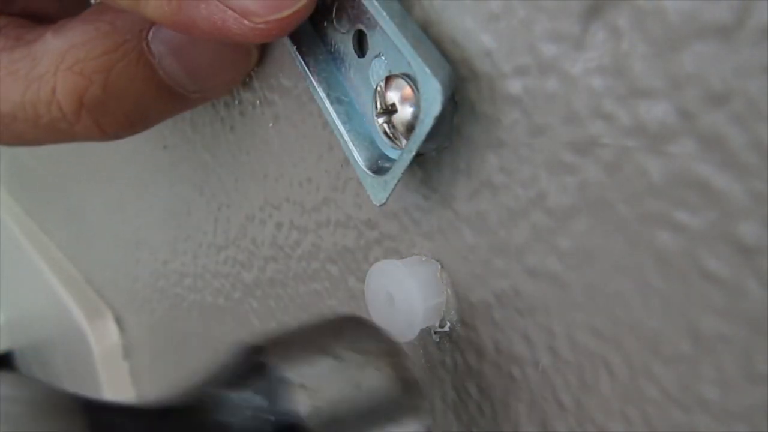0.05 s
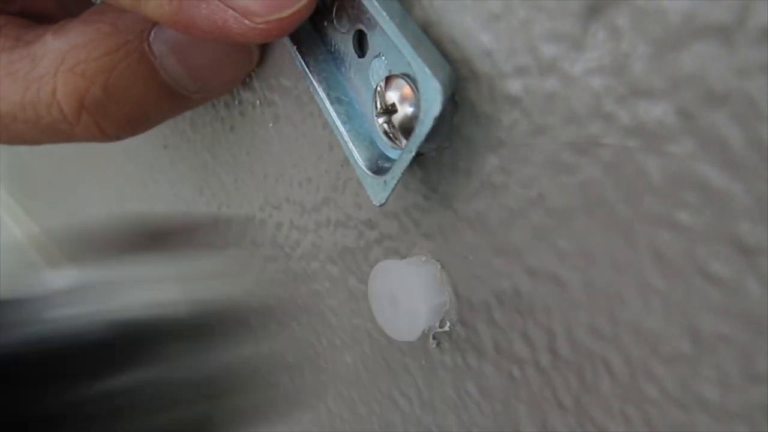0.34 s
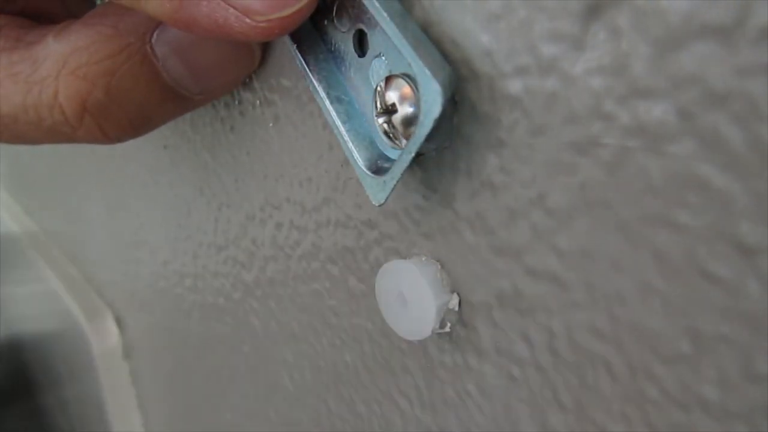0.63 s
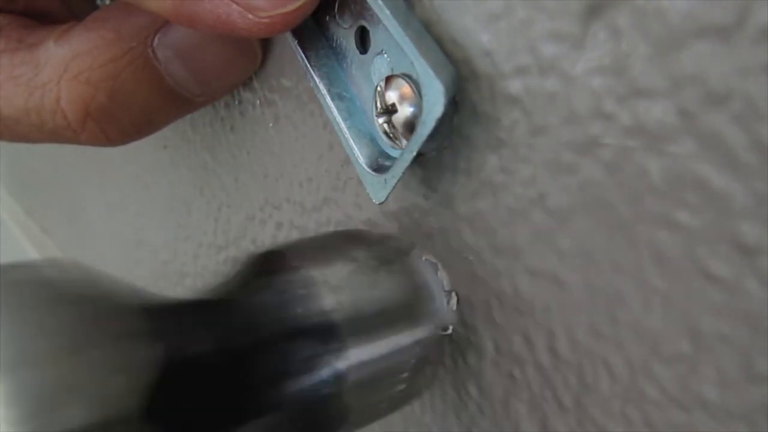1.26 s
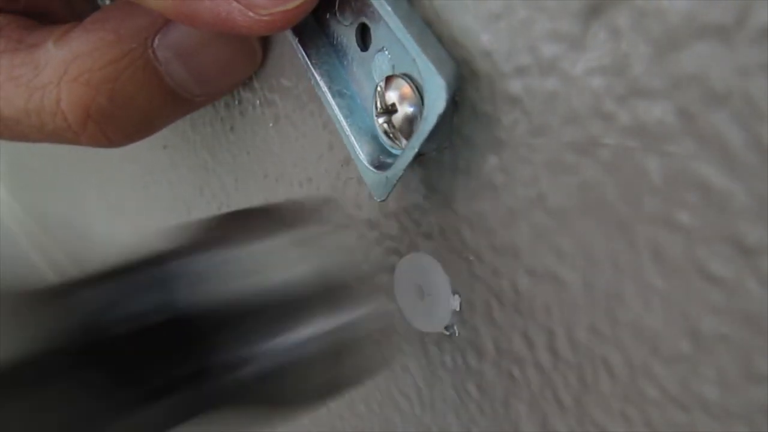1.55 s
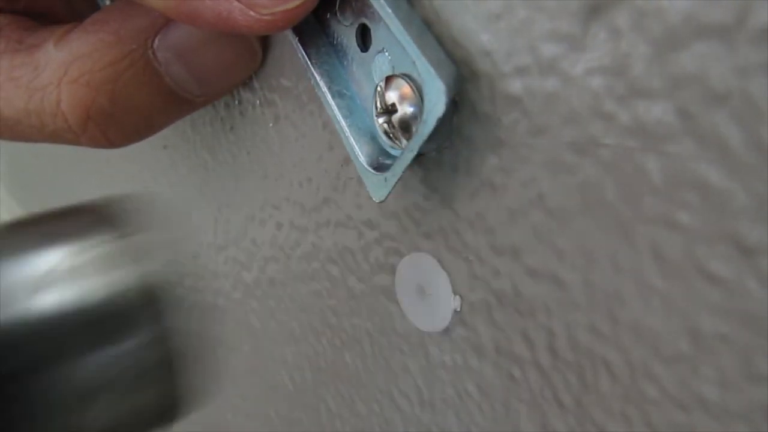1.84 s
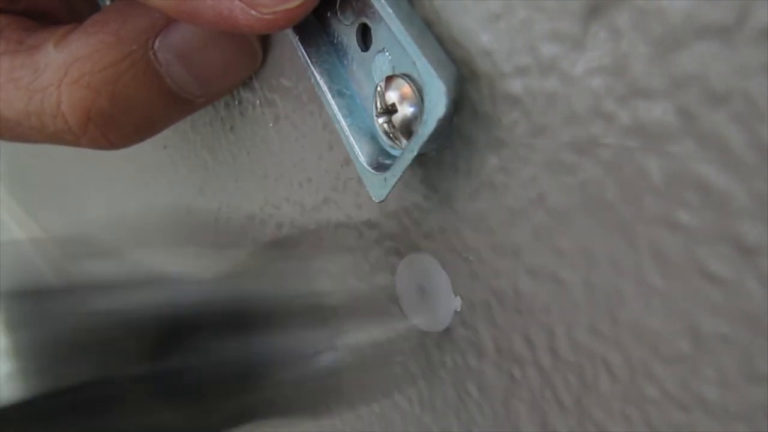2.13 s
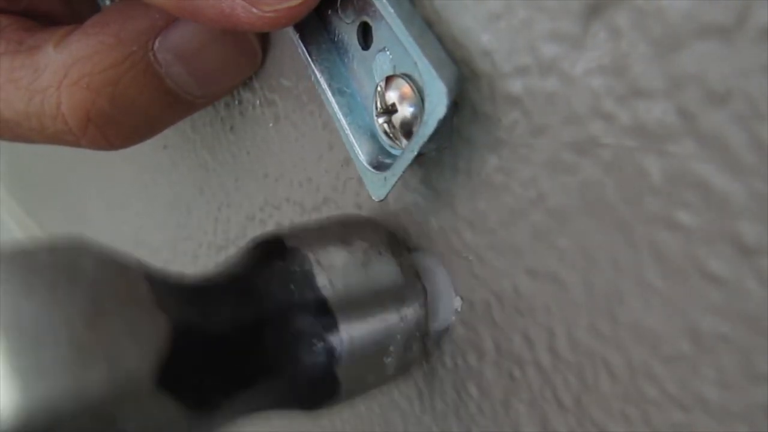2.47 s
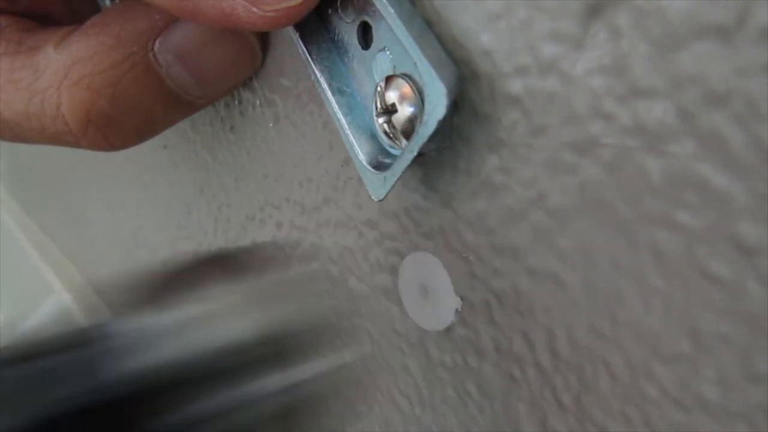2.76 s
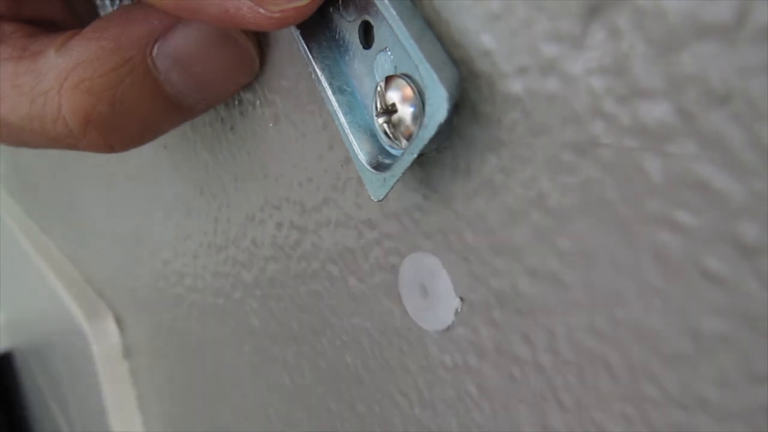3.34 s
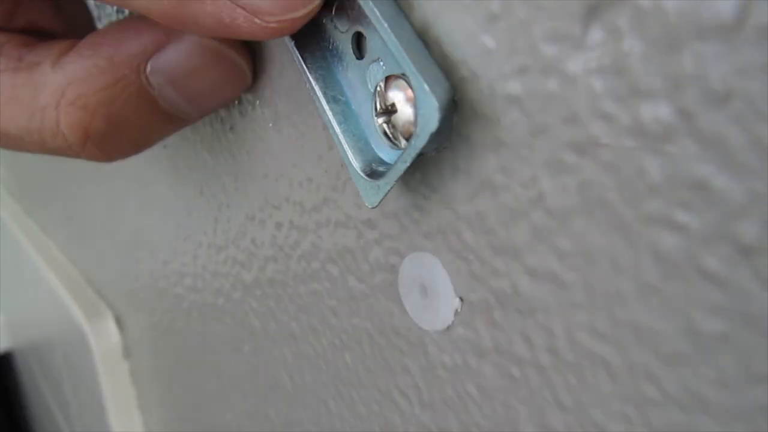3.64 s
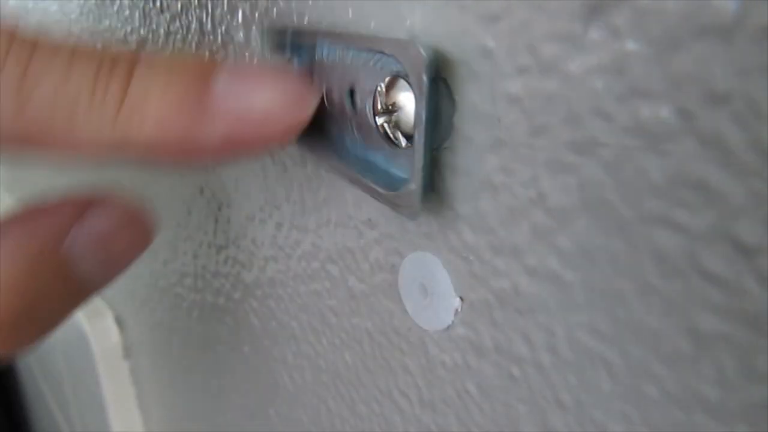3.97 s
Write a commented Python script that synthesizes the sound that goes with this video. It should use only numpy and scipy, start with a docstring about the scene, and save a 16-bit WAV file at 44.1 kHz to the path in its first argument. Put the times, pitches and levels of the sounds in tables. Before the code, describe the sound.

Steady, quick hammer blows drive a plastic anchor into a hollow wall in a small room, overloading the close microphone and rattling a metal bracket. After the hammering ends, fingers shift the bracket with a few soft ticks and scrapes.

```python
"""A small room: a hammer taps a plastic anchor into a hollow wall, four blows a second, close up.
Each blow shoves the wall panel and makes a loose metal bracket chatter; the hammer bounces once.
The knocks harden as the anchor sinks, and the thuds overload the microphone.
At the end, fingers shift the bracket with a few ticks and scrapes."""
import sys
import numpy as np
from scipy import signal
from scipy.fft import rfft, irfft, next_fast_len
from scipy.io import wavfile
from scipy.ndimage import uniform_filter1d

SR = 44100
rng = np.random.default_rng(int(sys.argv[2]) if len(sys.argv) > 2 else 0)


def wav_out(sig):
    """Save sig, one row per channel (or a flat mono array), as 16-bit PCM at SR to the path in sys.argv[1]."""
    wavfile.write(sys.argv[1], SR, np.round(np.clip(np.atleast_2d(sig).T, -1, 1) * 32767).astype(np.int16))


N = 176400
T = np.arange(int(.8 * SR)) / SR  # time axis of one event
BRIGHT_HZ = 3480  # shelf corner for every bright_db


def amp(db):
    """Decibels to gain."""
    return 10 ** (np.asarray(db) / 20)


def unit(x):
    """Scale to rms 1."""
    return x / np.sqrt(np.mean(x ** 2) + 1e-20)


def fade(t60_s):
    """Exponential decay, 60 dB in t60_s."""
    return np.exp(-np.log(1000) * T / t60_s)


def rise(tau_s=0.0027):
    """Exponential build-up of a resonance."""
    return 1 - np.exp(-T / tau_s)


def along(points, hz):
    """Interpolate (freq_hz, value) points on a log frequency axis."""
    freq_hz, values = np.transpose(points)
    return np.interp(np.log(hz + 1), np.log(freq_hz + 1), values)


def filtered(x, response):
    """Apply a frequency response by FFT."""
    size = next_fast_len(len(x) + SR // 10)
    return irfft(rfft(x, size) * response(np.fft.rfftfreq(size, 1 / SR)), size)[:len(x)]


def noise(colour, size=len(T)):
    """Coloured noise of rms 1."""
    return unit(filtered(rng.standard_normal(size), lambda f: amp(along(colour, f))))


def shelf(x, corner_hz, db):
    """High shelf."""
    return filtered(x, lambda f: amp(db * f ** 4 / (f ** 4 + corner_hz ** 4)))


def add(track, start_s, sound):
    """Mix a sound into the track."""
    part = track[max(round(start_s * SR), 0):][:len(sound)]
    part += sound[:len(part)]


def ring(modes):
    """Decaying modes; level and phase vary per strike."""
    return sum(amp(db + 2 * rng.normal()) * fade(t60_s) * np.sin(2 * np.pi * (hz * T + rng.random()))
               for hz, db, t60_s in modes)


# freq_hz, gain_db
HUSH_COLOUR = [(25, 20), (60, 10.5), (200, 8.5), (600, 0), (2500, -20), (6000, -19.5), (11000, -17),
               (13000, -38.5)]

def room_hush(level_db=-77):
    """Steady low background noise."""
    return amp(level_db) * noise(HUSH_COLOUR, size=N)


# freq_hz, gain_db
ROOM_COLOUR = [(30, -5.5), (65, -12), (100, 2.5), (200, 1.5), (260, -3.5), (400, 3), (600, -4),
               (800, -10.5), (1200, -14.5), (2000, -18), (2900, -19), (4000, -26.5), (7000, -34.5),
               (11300, -36.5), (12800, -49.5), (16000, -49)]
# freq_hz, t60_s
ROOM_DECAY = [(80, 0.63), (500, 0.5), (1500, 0.5), (3000, 0.47), (6000, 0.53), (10000, 0.3), (15000, 0.25)]

def room_tail():
    """Diffuse echo; each frequency dies at its own rate."""
    hz, time_s, spectrum = signal.stft(noise(ROOM_COLOUR), SR, nperseg=512)
    decay = np.exp(-np.log(1000) * time_s / along(ROOM_DECAY, hz)[:, None])
    return signal.istft(spectrum * decay, SR)[1][:len(T)]


# freq_hz, gain_db
HANDLING_COLOUR = [(100, -16), (500, 1.5), (2000, 5), (3500, 1), (5500, -11), (9000, -5), (11500, -10.5),
                   (13000, -29), (16000, -37)]
# start_s, level_db, t60_s, bright_db
TICKS = [(1.021, -56, .008, 9), (3.5099, -50, 0.019, -2.5), (3.706, -62.5, .012, 10),
         (3.7805, -41, 0.0067, 2.5), (3.881, -59, 0.012, -51), (3.959, -44, 0.014, -16),
         (3.969, -47.5, 0.017, -24), (3.976, -46, 0.026, 3.5)]
# start_s, length_s, level_db, bright_db
SCRAPES = [(3.484, 0.04, -63, -5), (3.6, 0.16, -86.5, 11), (3.907, 0.13, -60.5, -10.5)]

def handling(grain_db=4, room_db=-14.5):
    """The bracket ticks under the fingers and scrapes on the paint, with a little echo."""
    out = np.zeros(N)
    for start_s, level_db, t60_s, bright_db in TICKS:
        click = shelf(noise(HANDLING_COLOUR), BRIGHT_HZ, bright_db)
        add(out, start_s, amp(level_db) * click * fade(t60_s))
    for start_s, length_s, level_db, bright_db in SCRAPES:
        roughness = unit(uniform_filter1d(rng.standard_normal(len(T)), size=90))
        grains = unit(amp(grain_db * roughness))
        stroke = np.sin(np.pi * np.minimum(T / length_s, 1)) ** 2
        friction = shelf(noise(HANDLING_COLOUR), BRIGHT_HZ, bright_db)
        add(out, start_s, amp(level_db) * stroke * grains * friction)
    echo = shelf(rng.standard_normal(len(T)), BRIGHT_HZ, db=-5) * fade(t60_s=0.59)
    return out + amp(room_db) * signal.fftconvolve(out, echo / np.linalg.norm(echo))[:N]


# freq_hz, gain_db
CHATTER_COLOUR = [(400, 19), (1200, 15), (2600, 11.5), (4500, 4.5), (8000, 11), (11500, 1.5),
                  (13000, -17.5), (16000, -22)]
# pitch_hz, level_db, t60_s
BRACKET_MODES = [(8300, -63.5, .05), (11000, -47, 0.028), (11160, -49, 0.027), (15000, -40, .022),
                 (14800, -58.5, .1)]

def chatter(burst_db=-23.5):
    """One slap of the loose bracket: a gritty burst and a thin ring."""
    return amp(burst_db) * noise(CHATTER_COLOUR) * fade(t60_s=0.0091) + ring(BRACKET_MODES)


# pitch_hz; the wall panel's modes, then a high pair from the bracket or hammer
STRIKE_MODES_HZ = [114, 146, 163, 194, 237, 294, 326, 356, 457, 496, 533, 634, 832, 2780, 2960]
# per mode: level_db, t60_s
STRIKE_RING = [(-22.5, 0.18), (-36.5, .33), (-31, .28), (-30.5, 0.46), (-37.5, 0.27), (-37.5, 0.54),
               (-39, 0.66), (-25.5, 0.2), (-33.5, 0.29), (-40.5, .52), (-60.5, .45), (-41, 0.55), (-49, 0.51),
               (-58, 0.21), (-57, 0.24)]

def wall_resonance(shared_tail, hard_db, bright_db, room_db=-30, shared_fraction=.85):
    """The wall rings on, with a high ring of the bracket or hammer, and the room answers; most of the echo
    repeats from blow to blow."""
    tail = np.sqrt(shared_fraction) * shared_tail + np.sqrt(1 - shared_fraction) * room_tail()
    wall = ring(np.column_stack([STRIKE_MODES_HZ, STRIKE_RING]))
    ringing = (amp(room_db) * tail + wall) * rise()
    lifted = shelf(ringing, corner_hz=268, db=hard_db)
    hardened = shelf(lifted, corner_hz=2220, db=-hard_db)  # hardness acts on the mids only
    return shelf(hardened, BRIGHT_HZ, bright_db)


def panel_swing(contact_s, t60_s, pitch_hz=146.5, level_db=-11):
    """The panel swings back, heavily damped, once the hammer lets go."""
    released_s = np.maximum(T - contact_s, 0)
    return -amp(level_db) * np.sin(2 * np.pi * pitch_hz * released_s) * fade(t60_s)


def bounce_thud(contact_s=.0014, push_db=-15.02):
    """The hammer falls back on the anchor: a rounded push, then a brief swing."""
    push = amp(push_db) * np.sin(np.pi * np.minimum(T / contact_s, 1))
    return push + panel_swing(contact_s, t60_s=0.01)


def blow_thud(hard_db, crack_s=.00012, crack_db=-24.5, push_db=-9):
    """Steel meets plastic: a crack, an abrupt push, shorter as the anchor tightens, then the swing."""
    contact_s = .0011 * np.exp(-0.044 * hard_db)
    push = amp(push_db) * np.sqrt(np.clip(1 - T / contact_s, 0, 1))
    return np.where(T < crack_s, -amp(crack_db), push) + panel_swing(contact_s, t60_s=0.022)


# start_s, thud_db, ring_db, hard_db, bright_db, first_chatter_db, second_chatter_db
BLOWS = [(0.0, 13.5, -14.5, -3.5, -10, -32.5, -31), (0.2391, 10.5, -6.5, -7, -6, -15.5, -6),
         (0.4615, 8, -6.5, -7.5, -11, -12.5, 1.5), (0.7028, 9.5, -3.5, -5.5, -1, -4, -8),
         (0.9476, 6, -1.5, -6.5, -6, -34, -21), (1.1993, 8, -3.5, -4, 0.5, -9, -9),
         (1.4368, 4.5, -4, -1, 7, 2, -5.5), (1.68, 3.5, -2.5, 1, -3, -2, -18.5),
         (1.9324, 8.5, -2.5, 1, -12, 6, 0), (2.1623, 8.5, 0, -2.5, -3.5, -2.5, 3),
         (2.4146, 6.5, -2, 2.5, 5, 4.5, -1), (2.6554, 7, -4, 4, 6.5, 0, 0),
         (2.8823, 4.5, -1, 1, 3.5, 4.5, -4.5), (3.1182, 6, -3, -1, -3.5, 9.5, -4)]
# start_s, thud_db, chatter_lag_s, chatter_db
BOUNCES = [(0.278, -4, 0.0032, -28), (0.4889, -3, 0.0044, -41), (0.7273, 8, 0.0034, -8),
           (.9732, -5, 0.0037, -9.5), (1.2179, 3, 0.0026, -15), (1.4553, -4, 0.0021, -8),
           (1.7019, -21.5, 0.0031, -3.5), (1.9534, -13.5, 0.0065, -4.5), (2.18, 2.5, 0.0058, -5.5),
           (2.4319, 5, 0.0063, -6), (2.6785, -0.5, 0.0032, -7.5), (2.8986, 3, 0.0077, -7.5),
           (3.1346, -2, 0.0036, -8.5)]

def hammer(chatter_lags_s=(0.004, .0078), echo_db=-39, dull_db=-3, bounce_ring_db=-23):
    """Blows and bounces; the bracket slaps on the panel's return swings and stirs a bright echo."""
    out, tail = np.zeros(N), room_tail()
    tail_treble = tail - shelf(tail, corner_hz=2570, db=-37)
    chatter_echo = amp(echo_db) * tail_treble * rise()
    for start_s, thud_db, ring_db, hard_db, bright_db, *chatters_db in BLOWS:
        ringing = wall_resonance(tail, hard_db, bright_db + dull_db)
        add(out, start_s, amp(thud_db) * blow_thud(hard_db) + amp(ring_db) * ringing)
        for lag_s, chatter_db in zip(chatter_lags_s, chatters_db):
            add(out, start_s + lag_s, amp(chatter_db) * (chatter() + chatter_echo))
    for start_s, thud_db, lag_s, chatter_db in BOUNCES:
        ringing = wall_resonance(tail, hard_db=-13, bright_db=-12)
        add(out, start_s, amp(thud_db) * bounce_thud() + amp(bounce_ring_db) * ringing)
        add(out, start_s + lag_s, amp(chatter_db) * (chatter() + chatter_echo))
    return out


def scene():
    """Hammering and handling over the hush of the room, mono."""
    return (hammer() + handling() + room_hush())[None]


def gain_control(x, settle_s=0.62, knee_db=-41, makeup_db=4.5):
    """The gain slowly drops as the knocks keep coming."""
    pole = np.exp(-1 / (settle_s * SR))
    power = signal.lfilter([1 - pole], [1, -pole], x ** 2)
    return amp(makeup_db) * x / np.sqrt(1 + power / amp(knee_db) ** 2)


# freq_hz, gain_db
MIC_COLOUR = [(8000, -0.5), (11300, -1), (13000, -0.5), (14800, -5), (16000, -7)]

def record(dry, ceiling=0.077, sharpness=5, low_cut_hz=80.4, top_hz=16800):
    """Microphone overload on the thuds, then bass cut, treble droop, gain control and band limit."""
    clipped = dry[0] / (1 + np.abs(dry[0] / ceiling) ** sharpness) ** (1 / sharpness)
    thinned = filtered(clipped, lambda f: 1j * f / (low_cut_hz + 1j * f) * amp(along(MIC_COLOUR, f)))
    return filtered(gain_control(thinned), lambda f: np.clip((top_hz - f) / 1000, 0, 1))[None]


dry = scene()
out = record(dry)
wav_out(out)
```